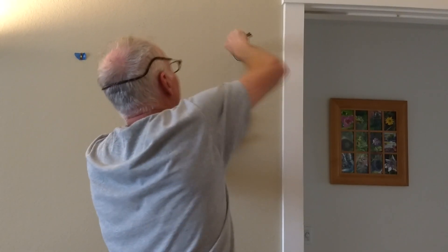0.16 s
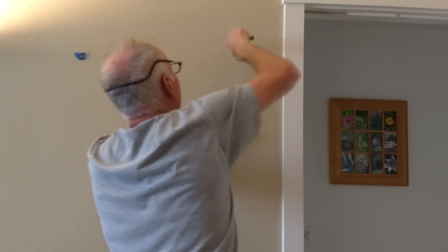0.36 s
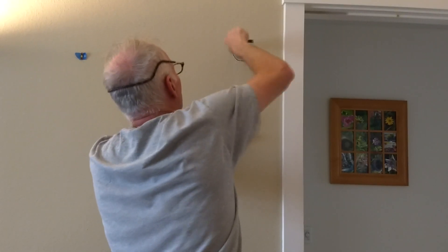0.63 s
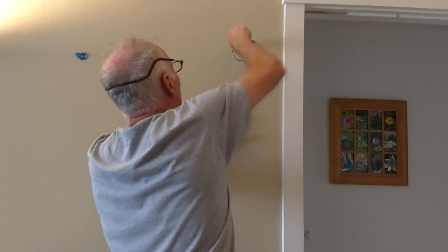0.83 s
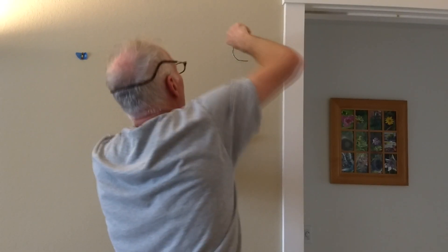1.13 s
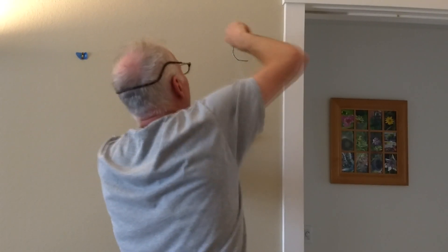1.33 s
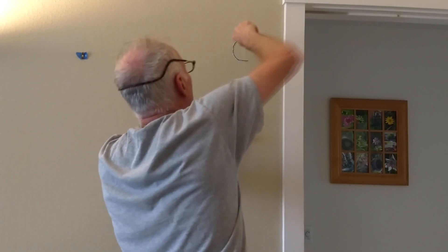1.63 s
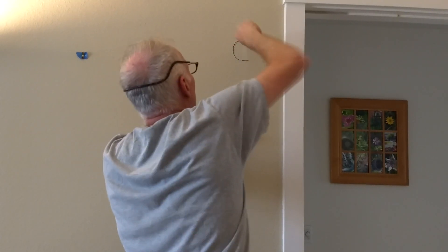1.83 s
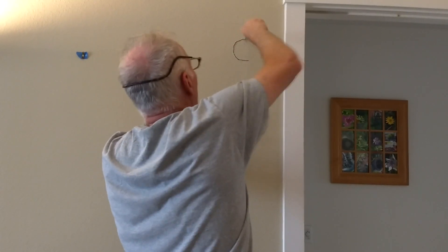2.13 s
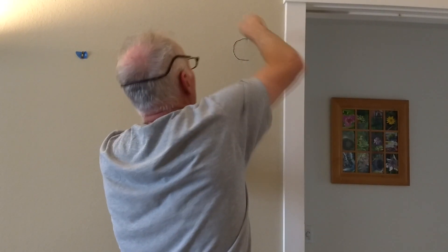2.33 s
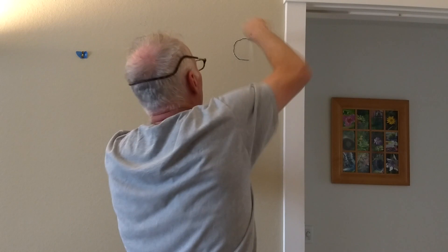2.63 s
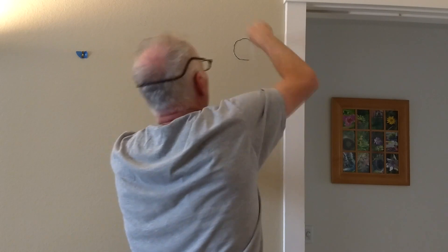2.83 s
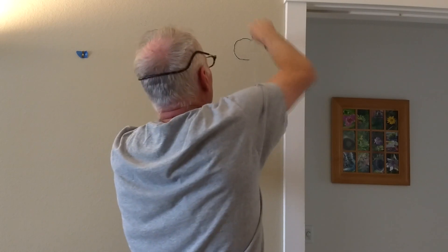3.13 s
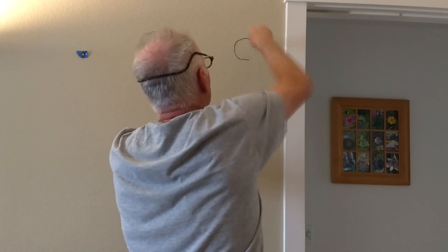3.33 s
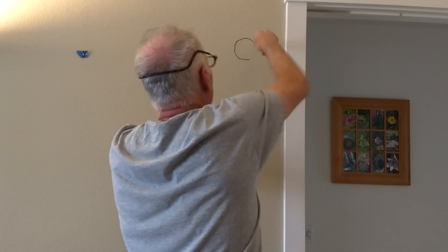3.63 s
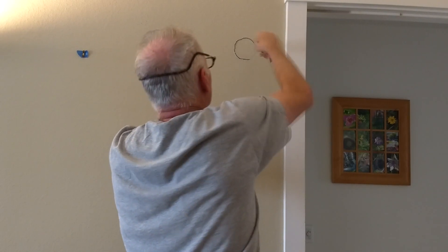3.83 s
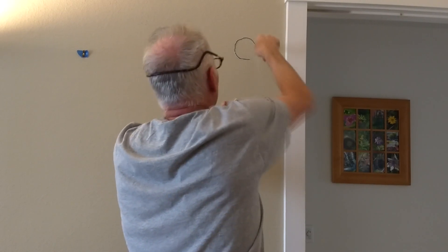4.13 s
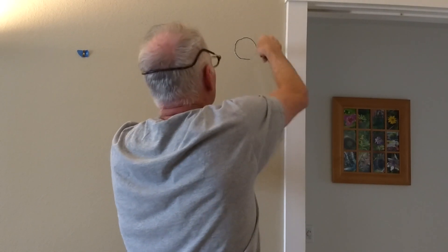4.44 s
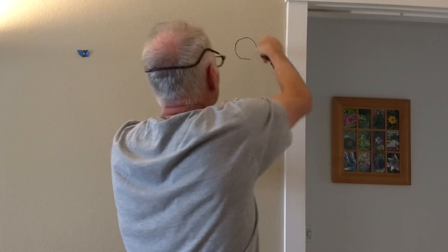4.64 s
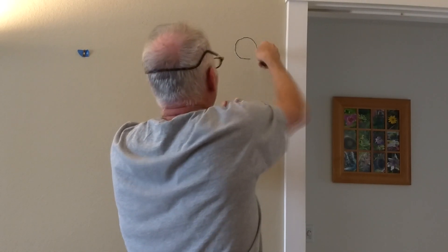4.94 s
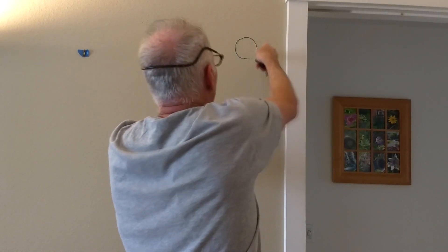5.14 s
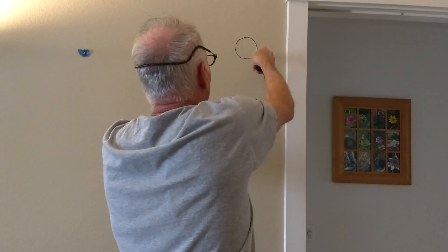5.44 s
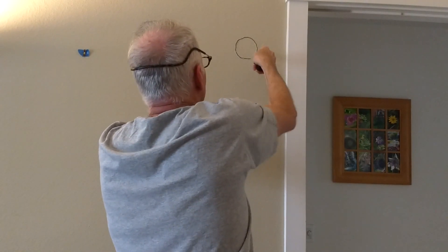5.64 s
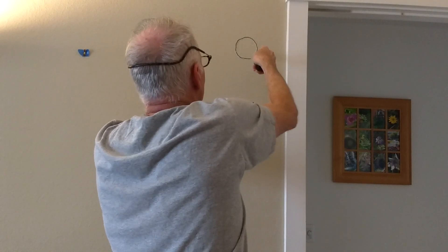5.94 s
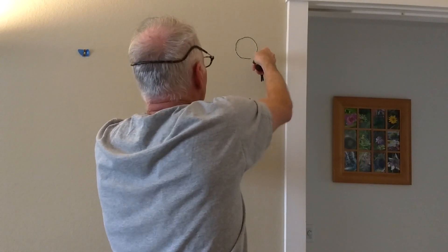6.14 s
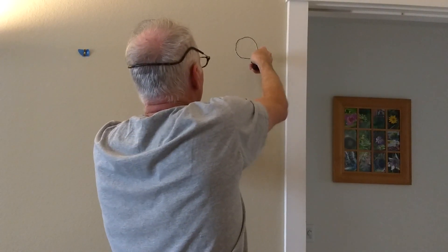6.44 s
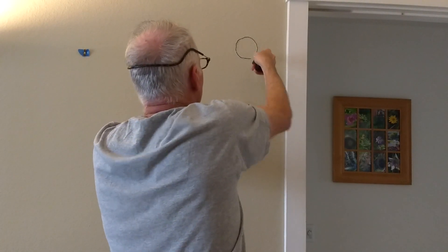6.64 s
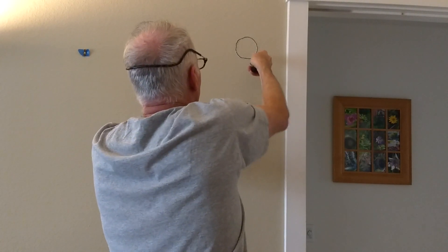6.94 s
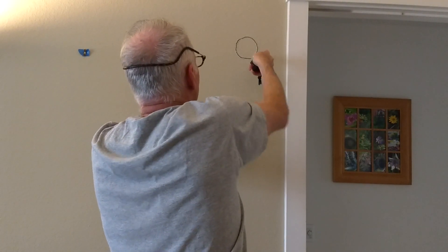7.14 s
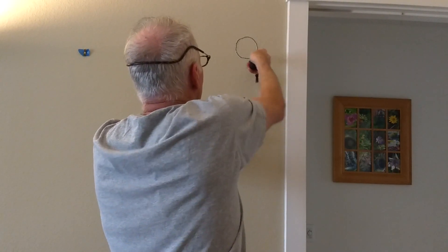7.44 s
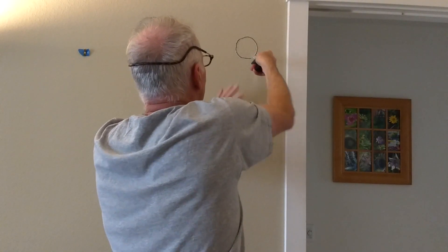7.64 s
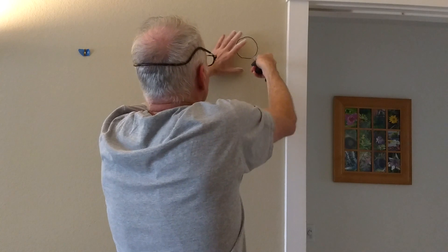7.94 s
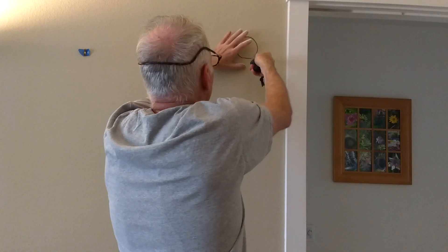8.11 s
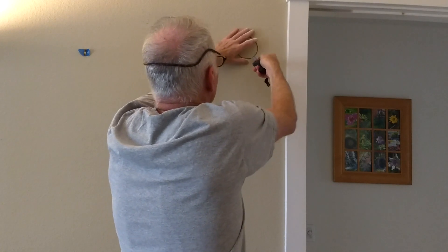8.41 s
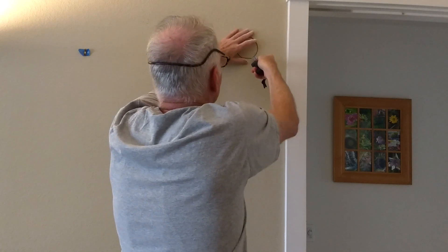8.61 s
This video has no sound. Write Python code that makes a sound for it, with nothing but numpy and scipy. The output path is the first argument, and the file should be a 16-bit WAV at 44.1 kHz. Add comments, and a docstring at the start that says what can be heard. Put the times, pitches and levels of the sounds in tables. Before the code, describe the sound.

A small hand saw cuts into a plasterboard wall in a quiet room. Its short, quick strokes make a gritty rasp and dusty hiss over the hollow thumping of the board, with teeth now and then snagging or ticking. After an opening run it pauses, gives a lone knock, then saws on at length with brief rests, ending in a few small strokes. The sound is fairly dry, with a slight room echo.

```python
"""A jab saw cuts a hole in a plasterboard wall indoors, in short quick strokes with pauses.
Each tooth bite thumps the hollow board, rings its modes and crushes gypsum into a gritty hiss.
Teeth snag and tick; the board changes colour as the disc is cut free.
A noise gate turns down the room's echo and air whenever the saw rests."""
import sys
import numpy as np
from scipy import signal
from scipy.io import wavfile
from scipy.ndimage import uniform_filter1d

SR = 44100
rng = np.random.default_rng(int(sys.argv[2]) if len(sys.argv) > 2 else 0)


def put_to_file(sound):
    """Save the sound as 16-bit audio at rate SR, in the file named by the first command-line argument."""
    columns = np.atleast_2d(sound).T  # one column per channel
    safe = np.clip(columns, -1, 1)
    whole_steps = np.round(safe * 32767)
    wavfile.write(sys.argv[1], SR, whole_steps.astype(np.int16))


N = 386745

# Blade strokes: start_s, length_s, grit_db, growth_db, fizz_re_rasp_db, tooth_hz, evenness_0_to_1,
# hardest_after_s, ease_db_per_s, push_db, knock_re_push_db, ring_re_push_db
STROKES = [(0.009, 0.15, -60, 2, 0.5, 83.45, 0.17, 0.062, 86, -38, 0.5, -11),
           (0.196, 0.06, -66.0, 4.0, 2, 98, 0.49, 0.036, 280, -45.5, -3.5, -7.5),
           (0.278, 0.087, -78, -19, -0.5, 77.9, 0.6, 0.012, 297, -49.5, -5, -11),
           (0.372, 0.087, -60, 3, -1.5, 77.2, 0.73, 0.059, 200, -41.5, -1.5, -7),
           (0.472, 0.12, -57.5, -5.5, -2, 74.94, 0.33, 0.044, 137, -37, -2.5, -7),
           (0.592, 0.16, -61.5, -6, 1, 90.37, 0.93, 0.056, 89, -36.5, -1.5, -10.5),
           (0.744, 0.11, -56, 5, 1, 117, 0.33, 0.072, 195, -26.5, -4.5, -12.5),
           (0.863, 0.17, -66.5, -4.0, 5.5, 87.7, 0.24, 0.12, 300, -34, -5.5, -14),
           (1.024, 0.12, -56.5, -1, 2, 116.8, 0.68, 0.076, 217, -26.5, -5.5, -11.5),
           (1.174, 0.12, -78.5, -24.0, 0, 80.13, 0.41, 0.01, 140, -45, -5.5, -9.5),
           (1.327, 0.095, -66, 3.5, 5, 84.45, 0.19, 0.053, 120, -42.5, -3.5, -9),
           (1.434, 0.21, -68.5, -5, 7, 83.7, 0, 0.11, 162, -38.5, -3.5, -9),
           (2.193, 0.068, -73, -9, -16.0, 115.7, 0.19, 0.01, 181, -54, 9.5, 0.5),
           (2.679, 0.067, -79, 3, 7, 144.2, 0.08, 0.011, 402, -55.5, 1.5, -6),
           (2.739, 0.12, -57, 5.0, -0.8, 61.95, 0.81, 0.071, 133, -43, -2, -6),
           (2.961, 0.02, -67.5, -3, -2, 64.1, 0.67, 0.009, 402, -66, 3.5, 0),
           (3.076, 0.14, -52.0, 3, 3, 137, 0.46, 0.091, 221, -29.5, -3, -8),
           (3.238, 0.16, -57.0, 4, 3.5, 115.6, 0.28, 0.13, 300, -32.5, -3.5, -10),
           (3.393, 0.14, -56, -2.5, -1, 59.95, 0.64, 0.095, 217, -33.5, -6.5, -10.5),
           (3.555, 0.15, -62.5, -2, 1, 60.32, 0.95, 0.1, 262, -39, -5.5, -11),
           (3.709, 0.13, -52, 0.5, 0.0, 108.4, 0.75, 0.085, 160, -27, -4, -13.5),
           (3.85, 0.15, -66.5, 1, 8, 120.9, 0.95, 0.11, 360, -30.5, -2, -13),
           (3.995, 0.16, -53.0, -1.5, -1.5, 86, 0.63, 0.11, 184, -32, -2, -8.5),
           (4.149, 0.15, -63.5, 3.0, 6, 85.2, 0.39, 0.12, 300, -34.5, -4.5, -10),
           (4.304, 0.17, -55.5, -5, 1, 84.0, 0.51, 0.092, 148, -32, -2, -11.5),
           (4.475, 0.12, -60.5, 0, 2.0, 76.8, 0.31, 0.098, 320, -35.5, -3, -9),
           (4.594, 0.099, -60, 2.0, 2, 84.7, 0.63, 0.027, 102, -35.5, -0.5, -9),
           (4.692, 0.056, -59.5, -10.0, -3, 59.7, 0.29, 0.019, 222, -41.5, -7, -4),
           (4.778, 0.049, -78.5, -10, 4.5, 106.7, 0.38, 0.01, 402, -54.5, 1, -4.5),
           (4.912, 0.12, -55.5, -2, 3, 84.46, 0.45, 0.079, 203, -30, -2.5, -11),
           (5.053, 0.13, -63.0, 2, 4.5, 99.0, 0.28, 0.09, 220, -32.5, -4, -14),
           (5.191, 0.11, -54.0, 7, -1.0, 79.87, 0.76, 0.069, 137, -33.5, -4, -8.5),
           (5.338, 0.14, -62.5, 3, 3.5, 119.4, 0.95, 0.11, 320, -29, -3, -14),
           (5.477, 0.089, -64, 10, 3.5, 61.2, 0.77, 0.042, 183, -34, -3.5, -11),
           (5.698, 0.099, -70, -1.0, 5.0, 59.74, 0.66, 0.066, 200, -38.5, -2.5, -14.5),
           (5.802, 0.12, -55.5, 4.5, 2, 75.46, 0.59, 0.087, 156, -32.5, -2.5, -8),
           (5.961, 0.11, -62.5, 7, 5.5, 86, 0.7, 0.092, 404, -37.5, -5, -12.5),
           (6.087, 0.074, -58.5, 4.5, 1, 62.5, 0.84, 0.03, 150, -40.5, -2.5, -9),
           (6.318, 0.085, -73.5, -14.5, 1.0, 77.9, 0.71, 0.034, 225, -53, -4, -8),
           (6.423, 0.097, -54, 0, 0.5, 76.03, 0.79, 0.039, 116, -31, -3.5, -12.5),
           (6.576, 0.14, -64.5, 1.0, 4, 71.07, 0.33, 0.09, 160, -39, -2, -11.5),
           (6.718, 0.13, -50.5, 5.0, 1.5, 117.0, 0.77, 0.074, 85, -28.5, -2, -10),
           (6.864, 0.12, -66.5, -11, 3, 109, 0.63, 0.018, 124, -39.5, -6, -11),
           (7.025, 0.06, -54.5, 1, -1.5, 117.6, 0.46, 0.034, 180, -29.5, -1.5, -14.5),
           (7.166, 0.13, -60.5, 9, 2.5, 77.1, 0.5, 0.12, 140, -36.5, 2.5, -9.5),
           (7.32, 0.14, -52, 10.5, 0.2, 118, 0.44, 0.11, 235, -32.5, 1.5, -7),
           (7.51, 0.16, -59.0, -0.5, 2.5, 112.9, 0.34, 0.11, 160, -34.5, -1, -8),
           (7.656, 0.16, -58.0, -5.5, 3.8, 117.4, 0.82, 0.088, 138, -28, -2, -12),
           (7.811, 0.14, -59.5, 5.5, 1, 81.65, 0.71, 0.12, 360, -36, -0.5, -14.5),
           (7.964, 0.073, -58, -2, 0.0, 87.14, 0.72, 0.04, 195, -39, -3.5, -9.5),
           (8.13, 0.12, -70, 5, 9.5, 118, 0.69, 0.077, 218, -31, 0, -14.5),
           (8.255, 0.15, -54, 12, -0.5, 147.8, 0.55, 0.11, 182, -29, -1.5, -10.5),
           (8.519, 0.061, -63.5, -5.0, -2.5, 62.5, 0.62, 0.03, 232, -42.5, -12, -12),
           (8.588, 0.075, -60.5, 5.5, -2.0, 82.2, 0.64, 0.045, 180, -45, 2.5, -6.5),
           (8.732, 0.041, -63.5, 10, -3, 82.1, 0.31, 0.023, 20, -44.5, -1, -9)]
# Coarse gypsum crumbs: freq_hz, density_db
RASP_SPECTRUM = [(820, -22.5), (1400, -5), (1900, -7), (3250, -11), (4060, -14), (5500, -15.5),
                 (7150, -22.5), (12100, -120)]
# Fine gypsum dust: freq_hz, density_db
FIZZ_SPECTRUM = [(2650, -44), (4500, -5.5), (5420, -8.5), (6910, 0), (13300, 2), (15500, -3.5)]


def saw(drag_db=-30):
    """Uneven tooth bites and the crumbling between them drive board, gypsum and blade."""
    # Board bowing between the studs: freq_hz, density_db
    thump_spectrum = [(15, -64), (30, -29), (45, -2), (70, -2.5), (120, -5.5), (150, -8.5), (200, -19.5),
                      (400, -61)]
    # Hollow behind the board: freq_hz, density_db
    knock_spectrum = [(60, -50), (120, -14), (160, 2), (230, -1), (285, -2.5), (330, -14.5), (420, -19),
                      (800, -73.5)]
    # Slope under the modes: freq_hz, density_db
    ring_spectrum = [(150, -24), (250, 4), (401, -12), (450, -15), (620, -10), (897, -12.5), (2400, -43),
                     (3120, -63), (5280, -120)]
    push, knock, ring = hand_pressure()
    rasp, fizz, tooth_hz, evenness = blade_motion()
    jitter = 1 + .25 * (1 - evenness) * wobble(.004) + .06 * wobble(.03)
    teeth_passed = np.cumsum(tooth_hz * jitter) / SR
    tooth = np.floor(np.maximum.accumulate(teeth_passed)).astype(int)
    scatter = np.clip(rng.standard_normal(N // 50), -2, 2)
    bite_size = gain_of(3 * (1.2 - evenness) * scatter[tooth])
    onsets = np.diff(tooth, prepend=0) > 0
    bites = unit_rms(onsets * bite_size * np.sqrt(SR / tooth_hz))  # same power at any speed
    crumble = unit_rms(np.sqrt(bite_size) * (1.1 + np.exp(-(teeth_passed % 1) / .25)))  # peaks at a bite
    jolts = np.sqrt(evenness * (2 - evenness)) * bites
    jolts += np.sqrt(1 - evenness) * 0.92 * crumble * rng.standard_normal(N)
    ringing = ring * (0.51 * bites + 0.98 * crumble * rng.standard_normal(N))
    rasp = rasp + gain_of(drag_db) * push  # the blade still drags as it reverses
    coarse = rasp * crumble * gain_of(wobble(0.031)) * crumbs(spread_db=1.2, rate_hz=7000)
    dust = crumbs(spread_db=2.2, rate_hz=12000)
    fine = fizz * crumble * gain_of(-4 + 2 * wobble(0.0047)) * dust
    lows = board(push * jolts, thump_spectrum) + board(knock * jolts, knock_spectrum)
    highs = board(ringing, ring_spectrum) + board(coarse, RASP_SPECTRUM) + board(fine, FIZZ_SPECTRUM)
    return lows + moving_bite(highs)


def hand_pressure(lean_share=0.14, rise_db=12.5, rise_bend=1.63, release_db_per_s=1500):
    """Pressure climbs to each stroke's hardest moment, eases off and dies at a rest."""
    # The hand lets go until the next stroke: time_s
    rests = [.338, 1.652, 2.258, 2.705, 2.908, 2.978, 4.81, 5.66, 6.215, 6.395, 6.99, 8.095, 8.49]
    time_s = np.arange(N) / SR
    push, knock, ring = np.zeros((3, N))
    for start_s, *_, hardest_s, ease_db_per_s, push_db, knock_db, ring_db in STROKES:
        lean_s = lean_share * hardest_s  # pressure leads the stroke
        at = max(round((start_s - lean_s) * SR), 0)
        span = slice(at, at + SR)
        age_s = time_s[span] - start_s + lean_s
        peak_s = max(hardest_s, .003) + lean_s
        release_s = min([s for s in rests if s > start_s + .01] + [N / SR]) - start_s + lean_s
        shape_db = (-rise_db * np.clip(1 - age_s / peak_s, 0, 1) ** rise_bend
                    - ease_db_per_s * np.maximum(age_s - peak_s, 0)
                    - release_db_per_s * np.maximum(age_s - release_s, 0))
        push[span] = gain_of(push_db + shape_db)
        knock[span] = gain_of(push_db + knock_db + 1.41 * shape_db)  # knock and ring swing more steeply
        ring[span] = gain_of(push_db + ring_db + 1.375 * shape_db)
    return uniform_filter1d([push, knock, ring], size=300)


def blade_motion(lead_s=.004, slowing=.35, initial_hz=70.):
    """Rasp and fizz swell with blade speed; the teeth come slower near each reversal."""
    rasp, fizz = np.zeros((2, N))
    tooth_hz, evenness = np.full(N, initial_hz), np.full(N, .3)
    for start_s, length_s, grit_db, growth_db, fizz_db, peak_hz, stroke_evenness, *_ in STROKES:
        at = max(round((start_s - lead_s) * SR), 0)
        progress = np.linspace(0, 1, round((length_s + 2 * lead_s) * SR))[:N - at]
        span = slice(at, at + len(progress))
        swell = abs(np.sin(np.pi * progress)) * gain_of(grit_db + 2 * growth_db * (progress - .5))
        rasp[span] += swell
        fizz[span] += swell * gain_of(fizz_db)
        tooth_hz[at:] = peak_hz * (1 - slowing)
        tooth_hz[span] = peak_hz * (1 - slowing * (2 * progress - 1) ** 2)
        evenness[at:] = stroke_evenness
    return rasp, fizz, uniform_filter1d(tooth_hz, size=600), uniform_filter1d(evenness, size=600)


def crumbs(spread_db, rate_hz):
    """Crushed gypsum: dense clicks of uneven size, rms 1."""
    size = gain_of(spread_db * np.minimum(rng.exponential(1, N), 4))
    return unit_rms(size * rng.standard_normal(N) * (rng.random(N) < rate_hz / SR))


def board(drive, spectrum):
    """Board and blade resonate; their modes change as the disc is cut free."""
    # Modes above the slope: freq_hz, width_hz, early_db, late_db
    modes = [(82.9, 21, 5, -5.5), (116.6, 51, 6.5, 7.5), (177, 15, -4.5, 11.5), (467.2, 18.6, 16.5, 18),
             (636, 59, 9, 10.5), (745, 42, 4, -7), (1027, 12, 7.5, 3), (1305, 200, 4, 7.5),
             (1697, 28, 11, -1.5), (1950, 160, -4.5, -4.5), (2235, 39, 3, 7), (2694, 16, 4.5, 10.5),
             (3230, 710, -6.5, 5.5), (3310, 220, -0.5, 7), (3750, 250, 4, 4.5), (4510, 58, 8, -8.5),
             (5560, 800, -8, 7), (7890, 830, 4, 7), (10600, 2200, -1, 6.5), (13500, 820, 2, -3)]
    # Progress of the cut: time_s, late_share
    freed = [(0, 0.1), (2.5, 0), (4.001, 0.37), (5.501, 0.53), (6.5, 0.75), (7.2, 0.88), (8.77, 0.99)]
    late_share = np.interp(np.arange(N) / SR, *np.transpose(freed))
    early = impulse_response(spectrum, [(hz, width_hz, db) for hz, width_hz, db, _ in modes])
    late = impulse_response(spectrum, [(hz, width_hz, db) for hz, width_hz, _, db in modes])
    early_sound = signal.oaconvolve(drive * (1 - late_share), early)
    return (early_sound + signal.oaconvolve(drive * late_share, late))[:N]


def moving_bite(sound, depth_db=1.37):
    """The biting point moves, so patches of the spectrum come and go."""
    bands = signal.stft(sound, nperseg=512)[2]
    patches = uniform_filter1d(rng.standard_normal(bands.shape), size=4, axis=0)
    patches = unit_rms(uniform_filter1d(patches, size=14, axis=1))
    return signal.istft(bands * gain_of(depth_db * patches), nperseg=512)[1][:N]


def snags(jolt_gain=0.72, tick_gain=0.74):
    """Snagging teeth jolt the board with a crack of grit; catching tips only tick."""
    # Snagging teeth: start_s, level_db, treble_re_level_db
    snag_events = [(0.385, -52, -23), (0.496, -34, -22), (0.766, -30.5, -34.5), (1.362, -31, -25),
                   (1.51, -22, -33.5), (2.2, -30, -28), (2.682, -45, -21), (2.744, -40, -29),
                   (3.924, -26.5, -37), (4.063, -30, -25), (4.948, -26, -25), (5.108, -28.5, -29),
                   (5.412, -21, -41), (6.445, -48, -15), (7.034, -44, -42), (7.26, -17.5, -31),
                   (7.526, -24, -29), (7.602, -40, -27), (8.165, -60, -39), (8.532, -46, -23)]
    # Catching tooth tips: start_s, level_db
    tick_events = [(0.1715, -47), (0.8025, -42), (3.1508, -44), (4.0228, -46), (4.6196, -44), (4.7143, -45),
                   (5.2401, -40.5), (6.724, -42.5), (6.795, -35), (7.0516, -37)]
    # One hard jolt on the board: freq_hz, density_db
    jolt_spectrum = [(30, -30.5), (90, -5.5), (200, 2), (330, -8), (700, -16.5), (2000, -42), (5000, -49),
                     (15000, -72.5)]
    jolts = np.zeros(N)
    for start_s, level_db, _ in snag_events:
        jolts[round((start_s + .002) * SR)] = -gain_of(level_db)  # thump sounds 2 ms after the crack
    jolts *= jolt_gain / abs(impulse_response(jolt_spectrum)).max()
    crack_events = [(start_s, level_db + treble_db) for start_s, level_db, treble_db in snag_events]
    cracks = board(bursts(crack_events, decay_s=0.0018), RASP_SPECTRUM)
    ticks = board(bursts(tick_events, decay_s=0.00097), FIZZ_SPECTRUM)
    return board(jolts, jolt_spectrum) + cracks + tick_gain * ticks


def bursts(events, decay_s):
    """A dying noise burst for each (start_s, level_db)."""
    track, age_s = np.zeros(N), np.arange(400) / SR
    for start_s, level_db in events:
        burst = gain_of(level_db) * np.exp(-age_s / decay_s) * rng.standard_normal(len(age_s))
        track[round(start_s * SR):][:len(burst)] += burst
    return track


def room_echo(sound):
    """Sparse reflections of random sign, each band dying at its own rate."""
    # Room decay: freq_hz, t60_s
    decay = [(60, 0.16), (500, 0.25), (3000, 0.44), (12000, 0.05)]
    taps = np.zeros(SR // 2)
    slots = np.arange(300, SR // 2 - 20, 20)
    taps[slots + rng.integers(0, 20, len(slots))] = rng.choice([-1., 1.], len(slots))
    hz, age_s, bands = signal.stft(taps, SR, nperseg=256)
    fade = gain_of(-60 * age_s / log_interp(decay, hz)[:, None])
    tail = signal.istft(bands * fade, SR, nperseg=256)[1]
    return signal.fftconvolve(sound, tail / np.linalg.norm(tail))[:N]


def room_air():
    """Steady low noise of the quiet room."""
    # Room air: freq_hz, density_db
    air_spectrum = [(18, -53.5), (42, -9.5), (64, 10), (123, -7), (277, -6.5), (410, -22), (467, -9),
                    (2130, -24.5), (15500, -34.5)]
    return signal.oaconvolve(rng.standard_normal(N), impulse_response(air_spectrum))[:N]


def noise_gate(sound, threshold_db=-57, slope=2.2, depth_db=20):
    """Turns quiet moments down, opening at once and closing a little late."""
    power = uniform_filter1d(sound[0] ** 2, size=1000, origin=380)
    power_db = 10 * np.log10(abs(power) + 1e-12)
    cut_db = np.clip(slope * (threshold_db - power_db), 0, depth_db)
    return sound / gain_of(uniform_filter1d(cut_db, size=160))


def impulse_response(spectrum, modes=()):
    """Minimum-phase response of energy 1: a slope plus resonant humps."""
    hz = abs(np.fft.fftfreq(16384, 1 / SR))
    humps = sum(gain_of(db) ** 2 / (1 + (2 * (hz - mode_hz) / width_hz) ** 2)
                for mode_hz, width_hz, db in modes)
    gain = gain_of(log_interp(spectrum, hz)) * np.sqrt(1 + humps)
    log_gain = np.log(np.maximum(gain, 1e-5))
    phase_rad = -signal.hilbert(log_gain).imag
    taps = np.fft.ifft(np.exp(log_gain + 1j * phase_rad)).real[:6000]
    return taps / np.linalg.norm(taps)


def wobble(time_constant_s):
    """Smooth random drift, rms 1."""
    pole = np.exp(-1 / (time_constant_s * SR))
    return unit_rms(signal.lfilter([1], [1, -pole], rng.standard_normal(N)))


def log_interp(table, hz):
    """Reads a table on a log-frequency axis."""
    table_hz, values = np.transpose(table)
    return np.interp(np.log(hz + 1), np.log(table_hz + 1), values)


def gain_of(db):
    """Decibels to an amplitude factor."""
    return 10 ** (np.asarray(db) / 20)


def unit_rms(x):
    """Scales to rms 1."""
    return x / np.sqrt(np.mean(x ** 2) + 1e-20)


def scene(echo_db=-14, air_db=-67):
    """Saw in the wall, its echo and the room air; mono."""
    wall = saw() + snags()
    air = gain_of(air_db) * room_air()
    return (wall + gain_of(echo_db) * room_echo(wall) + air)[None]


def record(dry, cutoff_hz=15600):
    """Noise gate, then a steep low-pass."""
    lowpass = signal.firwin(511, cutoff_hz, window=("kaiser", 9), fs=SR)
    return signal.oaconvolve(noise_gate(dry), lowpass[None], "same")


dry = scene()
out = record(dry)
put_to_file(out)
```